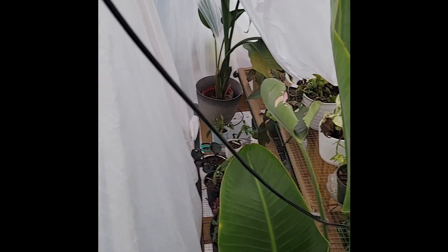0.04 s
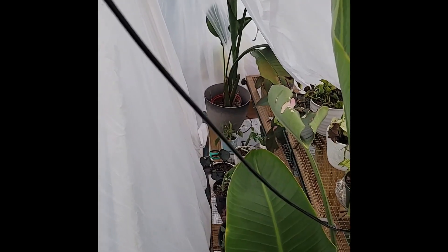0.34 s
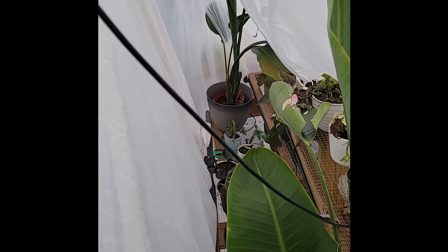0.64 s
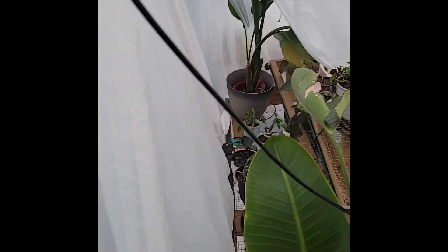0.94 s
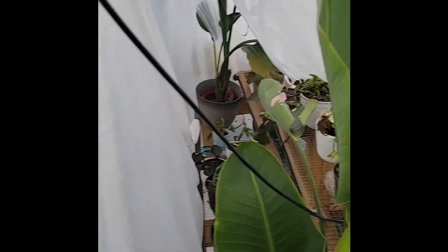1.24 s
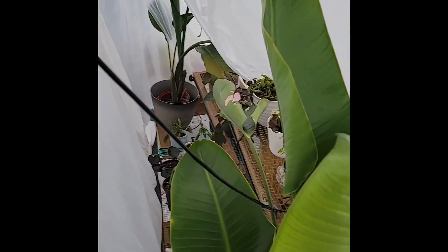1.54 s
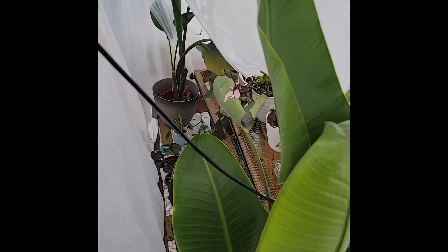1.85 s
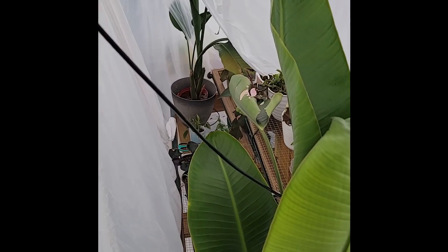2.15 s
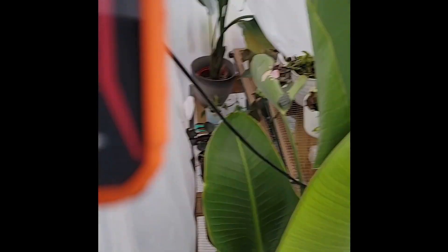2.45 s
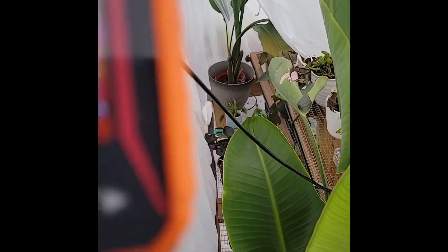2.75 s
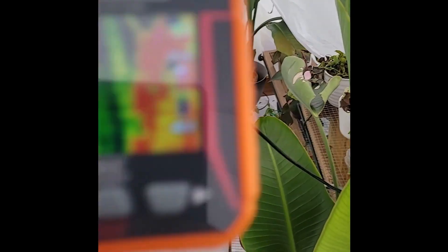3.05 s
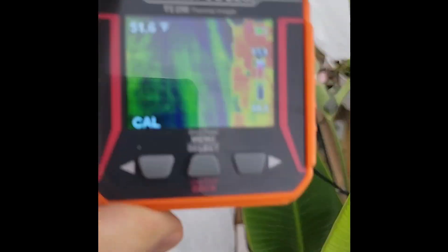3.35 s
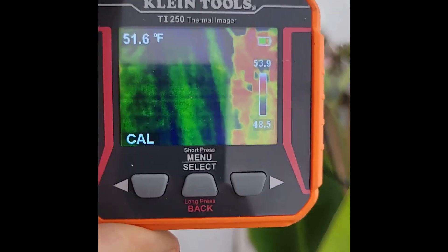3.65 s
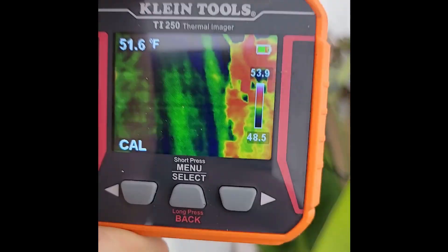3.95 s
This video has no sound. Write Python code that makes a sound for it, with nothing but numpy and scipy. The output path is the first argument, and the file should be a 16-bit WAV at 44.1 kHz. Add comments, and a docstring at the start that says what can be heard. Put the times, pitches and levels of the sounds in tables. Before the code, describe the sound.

Thin plastic sheeting or fabric swishes close to the right of the microphone in a greenhouse. The rubbing starts loud and swells unevenly, with small crinkles and soft handling bumps, then drops away. A low rumble and faint motor hum lie underneath.

```python
"""Thin fabric or plastic sheeting swishes by the right microphone port as someone moves about a greenhouse.
The rubbing, a spray of tiny slips, starts loud and swells again with each movement. From 0.75 s creases
snap and a fold scuffs; soft hand bumps follow from 1.2 to 2.3 s. More creases let go, the fold tightens
near 3 s, and the rubbing drops away after 3.7 s under three last crinkles.
A low rumble and a faint motor hum lie underneath throughout."""
import sys
import numpy as np
from scipy import signal
from scipy.fft import rfft, irfft, next_fast_len
from scipy.io import wavfile
from scipy.ndimage import uniform_filter1d, map_coordinates

SR = 44100
rng = np.random.default_rng(int(sys.argv[2]) if len(sys.argv) > 2 else 0)


def digitize_waveform(pressure):
    """Quantize a signal to 16-bit integers and store it at the path in sys.argv[1].

    Rows of a 2-D input are taken as channels; values are limited to [-1, 1].
    """
    field = np.atleast_2d(pressure).T
    bounded = np.clip(field, -1, 1)
    quanta = np.round(bounded * 32767).astype(np.int16)
    wavfile.write(sys.argv[1], SR, quanta)


N = 176400

# Rubbing. Each row: time in seconds, then overall, top, presence and body levels in relative dB.
RUB_LEVELS = [(0.0, -30.5, -0.5, -0.5, -8.0), (0.15, -28, -0.5, -2, -10), (0.24, -29.5, -1.5, -2.5, -10.5),
              (0.44, -38.5, 1, -1, -9.5), (0.62, -45, -3.5, -3.5, -9), (0.73, -44.5, 0.5, -2.5, -9),
              (0.8, -42, 0, -1.5, -6.5), (0.84, -39.5, 1.5, 2, -8), (0.96, -44, 1, 0.5, -7.0),
              (1.15, -42, 2, 0, -7.5), (1.22, -36.5, -1, -1.5, -9), (1.38, -36, -0.5, -0.0, -8),
              (1.52, -38, -2, -1.5, -10), (1.7, -39.0, 0.5, -2.5, -8.5), (1.79, -33, -0.5, -3.5, -9),
              (1.89, -33.5, 1.5, -2.0, -9.5), (1.95, -36.5, 1, -2.5, -9), (2.15, -39.5, 0.5, -0.5, -6.5),
              (2.27, -40, 3.5, 1.5, -4.5), (2.42, -41, 2.5, 1, -6), (2.51, -38, 1.5, -1, -7.0),
              (2.58, -42.5, -0.0, -2.5, -7.5), (2.68, -45, 1.5, -0.5, -8.0), (2.78, -44.5, 2.5, 3, -2),
              (2.81, -41.5, 6, 4, -3), (2.9, -40, 3.5, 1.5, -5.5), (2.98, -45.5, 5, 2.5, -4.5),
              (3.08, -39.5, 0.5, -1.5, -6), (3.23, -37.5, 2.5, -1, -6.5), (3.42, -39.5, 0.5, -3.5, -8),
              (3.62, -42, 4.5, 0.5, -2.5), (3.71, -42, 1.5, -2.5, -7.5), (3.79, -53, 1.0, 0.5, -5.5),
              (3.86, -51.5, -1, -4, -9), (3.91, -51.5, -2, -2.5, -9), (4.0, -52.5, 3, -1.5, -9.0)]
# Cloth spectrum at the near port. Each row: frequency in Hz, gain in dB.
CLOTH_SPECTRUM = [(40, -25), (120, -7), (250, -12), (500, -10), (1000, -9), (1600, -6), (2600, -9.5),
                  (3500, -2), (5000, 0), (6100, -2.5), (7300, 2), (8400, -5.5), (9500, -5.5), (11000, -9.5),
                  (12300, -9.5), (14500, -0.2), (16000, -5.5)]
# Fold tension. Each row: time in seconds, tightness from 0 to 1.
FOLD_TIGHTNESS = [(0, 0), (2.85, 0.03), (3.2, 1), (4, 1)]
# Tight fold. Each row: frequency in Hz, gain over the slack fold in dB.
TIGHT_FOLD_EQ = [(2500, 0.5), (3400, -1.5), (4300, 0), (5200, 2), (6200, 1), (7300, -0.5), (9500, 0.5),
                 (12000, 0)]
# Shifting cloth. Each row: time in seconds, left level in dB before centring and scaling.
LEFT_SHADE = [(0.0, -13), (0.36, -11), (0.58, -9.5), (1.27, -13), (1.73, -9.5), (1.79, -14), (2.08, -10.5),
              (2.39, -12), (2.62, -7.5), (2.77, -12), (3.82, -11.5), (3.84, -17), (3.88, -16), (4.0, -9.0)]
# Far port. Each row: frequency in Hz, gain over the near port in dB.
FAR_PORT_EQ = [(250, -6.3), (500, -6.5), (1500, -7.5), (2600, -1.7), (3500, -6.5), (5000, -10.5),
               (7300, -10.2), (9500, -9.7), (11800, -4.3), (14500, -12.3)]
# Likeness of the ports. Each row: frequency in Hz, coherence from 0 to 1.
PORT_COHERENCE = [(200, 0.33), (600, 0.42), (1500, 0.28), (2600, 0.078), (6100, 0.077), (7100, 0.9),
                  (9000, 0.79), (12000, 0.96), (14700, 0.73)]
# Creases. Each row: start in seconds, level in dB, snap offset in dB, trail T60 in seconds.
CREASES = [(0.750, -24.5, -25, .09), (0.821, -24.5, -20, .08), (0.918, -26.5, -3, .01),
           (2.054, -24, -2, .02), (2.627, -25.5, -4, .015), (2.7528, -25, -9, .04), (2.799, -24, -12, .06),
           (3.839, -27.5, -2.5, 0.018), (3.854, -29, -20, .06), (3.972, -35, -2.5, .015)]
# Crinkle brightness. Each row: frequency in Hz, gain over the cloth spectrum in dB.
CRINKLE_EQ = [(300, -5), (3500, -3), (7000, -1), (14500, 3)]
# Scuffs. Each row: centre in seconds, level in dB, pitch in Hz, 1/e half-width in seconds.
FOLD_SCUFFS = [(0.745, -54, 1590, .035), (1.104, -59, 1600, 0.066)]
# Bumps. Each row: start in seconds, gain in dB.
HAND_BUMPS = [(1.179, -39.5), (1.903, -42), (2.25, -43)]
# Ring of a bump. Each row: frequency in Hz, relative level in dB, T60 in seconds.
KNOCK_MODES = [(86, 4.5, 0.064), (235, 6, 0.02), (315, 0.5, 0.036)]
# Rumble course. Each row: time in seconds, level in dB.
RUMBLE_ENVELOPE = [(0, -46.5), (.25, -52), (.6, -54.5), (1.0, -55), (1.5, -53.5), (1.9, -50), (2.1, -52),
                   (2.45, -56.5), (2.6, -54.5), (3.2, -51), (4, -54.5)]
# Rumble colour. Each row: frequency in Hz, relative density in dB.
RUMBLE_SPECTRUM = [(20, -29), (30, -17), (39, -5), (48, -2), (58, 4.5), (70, 0), (95, -3), (150, -10),
                   (270, -14), (420, -27.5), (800, -26.5), (3000, -34.5)]
# Motor hum. Each row: time in seconds, level in dB.
HUM_ENVELOPE = [(0, -68), (1.0, -63.5), (1.9, -56.5), (2.3, -57), (2.7, -61.5), (3.7, -58.5), (4, -68)]

SLIPS_PER_S, SLIP_SPREAD_DB, SLIP_MAX_DB, SLIP_POWER_SHARE = 4500, 2, 9.5, 0.34
FLUTTER_PER_S, FLUTTER_DB, CHATTER_PER_S, CHATTER_DB = 35, 0.13, 210, 1.0
ROUGHEN_PER_DB, PATCH_DB, SHADE_SCALE = 0.025, 1.13, 0.81
SWISH_GAIN_DB, BODY_GAIN_DB, TOP_GAIN_DB = 4.5, 1, 2
BAND_EDGES_HZ = 2960, 6200, 9600
PORT_LAG_S, LAG_BELOW_HZ = 0.00029, 4450
TRAIL_DB, SNAP_T60_S = -9, 0.0071
BUMP_ATTACK_S = 0.0021
RUMBLE_COHERENCE, RUMBLE_LEFT_DB, RUMBLE_SWAY_DB = 0.75, -3, 1
HUM_HZ, HUM_DRIFT_RAD, HUM_WAVER_DB = 102.7, 0.24, 1
CUTOFF_HZ = 15850


def amp(db):
    """Decibels to gain."""
    return 10 ** (np.asarray(db) / 20)


def unit(x):
    """Scale to rms 1."""
    return x / np.sqrt(np.mean(x ** 2) + 1e-20)


def along(points, hz):
    """Interpolate (Hz, value) points on a log axis."""
    knots_hz, values = np.transpose(points)
    return np.interp(np.log(hz + 1), np.log(knots_hz + 1), values)


def curves(rows):
    """Per-sample curve of each column after the time."""
    times_s, *columns = np.transpose(rows)
    return [np.interp(np.arange(N) / SR, times_s, column) for column in columns]


def wobble(knots_per_s):
    """Smooth random curve."""
    return map_coordinates(rng.standard_normal(N // 20), [np.arange(N) * knots_per_s / SR], mode="wrap")


def filtered(x, response):
    """Apply a frequency response."""
    size = next_fast_len(N + SR // 2)
    return irfft(rfft(x, size) * response(np.fft.rfftfreq(size, 1 / SR)), size)[..., :N]


def equalised(x, points):
    """Apply a (Hz, dB) table."""
    return filtered(x, lambda hz: amp(along(points, hz)))


def below(hz, edge_hz, order=12):
    """Smooth low-pass gain."""
    return 1 / (1 + (hz / edge_hz) ** order)


def swish():
    """Cloth slides and catches; slow rubbing is more uneven than fast."""
    level_db, top_db, presence_db, body_db = curves(RUB_LEVELS)
    uneven = np.exp(ROUGHEN_PER_DB * (level_db.mean() - level_db))
    flutter_db = uneven * (FLUTTER_DB * wobble(FLUTTER_PER_S) + CHATTER_DB * wobble(CHATTER_PER_S))
    friction = unit(patchy_contact(slips()) * amp(flutter_db))
    cloth = tightening_fold(at_ports(friction))
    cloth = contact_colour(cloth, body_db, presence_db, top_db)
    shade_db, = curves(LEFT_SHADE)
    cloth[0] *= amp(SHADE_SCALE * (shade_db - shade_db.mean()))
    return amp(SWISH_GAIN_DB + level_db) * cloth


def slips():
    """Friction: tiny slips of uneven size over a smooth hiss."""
    hit = rng.random(N) < SLIPS_PER_S / SR
    size = amp(np.minimum(SLIP_SPREAD_DB * rng.exponential(size=N), SLIP_MAX_DB))
    grains = unit(hit * size * rng.uniform(-1.03, 1, (2, N)))
    hiss = rng.standard_normal((2, N))
    return np.sqrt(SLIP_POWER_SHARE) * grains + np.sqrt(1 - SLIP_POWER_SHARE) * hiss


def patchy_contact(x):
    """Changing contact drifts the colour in small time-frequency patches."""
    spectra = signal.stft(x, nperseg=512)[2]
    patches = uniform_filter1d(rng.standard_normal(spectra.shape[1:]), size=7, axis=0)
    patches = uniform_filter1d(patches, size=8, axis=1)
    return signal.istft(spectra * amp(PATCH_DB * unit(patches)), nperseg=512)[1][:, :N]


def tightening_fold(slack):
    """The rubbed fold changes colour as it tightens."""
    tightness, = curves(FOLD_TIGHTNESS)
    return (1 - tightness) * slack + tightness * equalised(slack, TIGHT_FOLD_EQ)


def contact_colour(x, body_db, presence_db, top_db):
    """Contact shifts three of four bands, each about its mean level."""
    body, to_presence, to_top = [filtered(x, lambda hz: below(hz, edge)) for edge in BAND_EDGES_HZ]
    return (body * amp(BODY_GAIN_DB + body_db - body_db.mean())
            + (to_presence - body) * amp(presence_db - presence_db.mean())
            + (to_top - to_presence)
            + (x - to_top) * amp(TOP_GAIN_DB + top_db - top_db.mean()))


def at_ports(pair):
    """Two unrelated excitations become cloth sound at the shaded left and near right ports."""
    near, unrelated = equalised(pair, CLOTH_SPECTRUM)
    coherence = lambda hz: along(PORT_COHERENCE, hz)
    lag = lambda hz: np.exp(-2j * np.pi * hz * PORT_LAG_S * (hz < LAG_BELOW_HZ))
    shared = filtered(near, lambda hz: coherence(hz) * lag(hz))
    separate = filtered(unrelated, lambda hz: np.sqrt(1 - coherence(hz) ** 2))
    far = equalised(shared + separate, FAR_PORT_EQ)
    return np.array([far, near]) * pair[0].std() / near.std()


def crinkles():
    """Each crease lets go with a sharp or soft snap and a short trail of slips."""
    t, envelope = np.arange(N) / SR, np.zeros(N)
    for start_s, level_db, snap_db, trail_t60_s in CREASES:
        age_s = np.abs(t - start_s)
        snap = amp(snap_db - 60 * age_s / SNAP_T60_S)
        trail = amp(TRAIL_DB - 60 * age_s / trail_t60_s)
        envelope += amp(level_db) * (t >= start_s) * (snap + trail)
    return equalised(at_ports(envelope * slips()), CRINKLE_EQ)


def scuffs():
    """A fold drags briefly with a soft, hollow note."""
    t, out = np.arange(N) / SR, np.zeros((2, N))
    for centre_s, level_db, pitch_hz, half_width_s in FOLD_SCUFFS:
        resonance = lambda hz: below(np.abs(hz - pitch_hz), edge_hz=0.11 * pitch_hz, order=2)
        note = filtered(rng.standard_normal((2, N)), resonance)
        envelope = np.exp(-((t - centre_s) / half_width_s) ** 2)
        out += amp(level_db) * envelope * unit(at_ports(note))
    return out


def bumps():
    """Soft knocks of a hand on the camera: low, quickly damped modes."""
    out = np.zeros(N)
    for start_s, gain_db in HAND_BUMPS:
        age_s = np.maximum(np.arange(N) / SR - start_s, 0)
        ring = sum(amp(mode_db - 60 * age_s / t60_s) * np.sin(2 * np.pi * hz * age_s)
                   for hz, mode_db, t60_s in KNOCK_MODES)
        out += amp(gain_db) * (1 - np.exp(-age_s / BUMP_ATTACK_S)) * ring
    return out


def rumble():
    """Low background rumble, largely shared by both ports."""
    right, unrelated = unit(equalised(rng.standard_normal((2, N)), RUMBLE_SPECTRUM))
    left = RUMBLE_COHERENCE * right + np.sqrt(1 - RUMBLE_COHERENCE ** 2) * unrelated
    level_db = curves(RUMBLE_ENVELOPE)[0] + RUMBLE_SWAY_DB * wobble(knots_per_s=6.67)
    return amp(level_db) * np.array([amp(RUMBLE_LEFT_DB) * left, right])


def motor_hum():
    """A distant motor's slightly unsteady tone."""
    phase_rad = 2 * np.pi * HUM_HZ * np.arange(N) / SR + HUM_DRIFT_RAD * wobble(knots_per_s=4.05)
    level_db = curves(HUM_ENVELOPE)[0] + HUM_WAVER_DB * wobble(knots_per_s=9)
    return amp(level_db) * unit(np.sin(phase_rad))


def scene():
    """Close cloth over the low background."""
    return swish() + crinkles() + scuffs() + bumps() + rumble() + motor_hum()


def record(dry):
    """The camera keeps nothing above its band limit."""
    return filtered(dry, lambda hz: hz < CUTOFF_HZ)


dry = scene()
out = record(dry)
digitize_waveform(out)
```